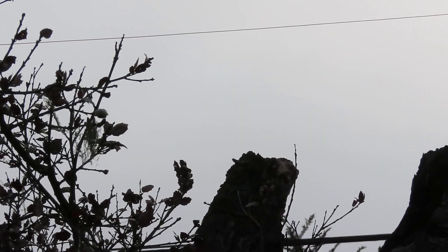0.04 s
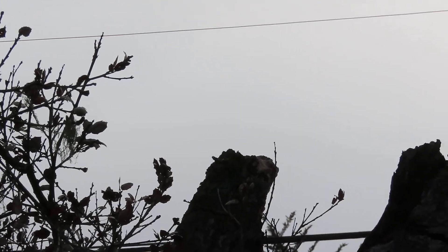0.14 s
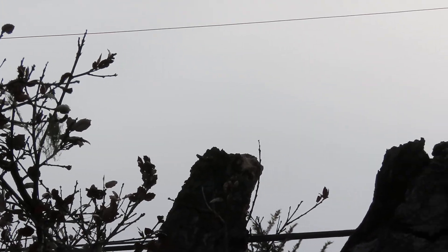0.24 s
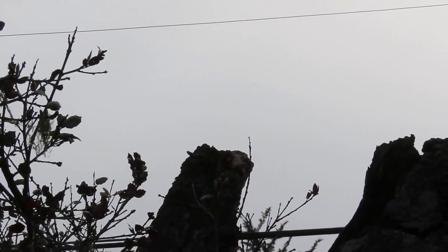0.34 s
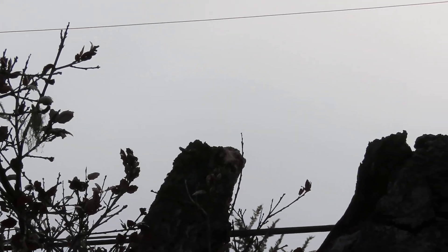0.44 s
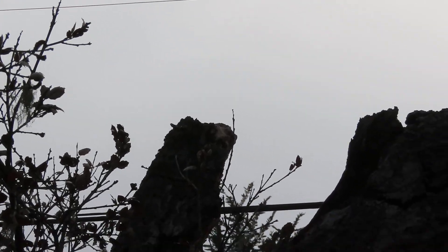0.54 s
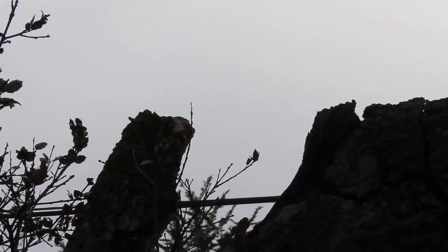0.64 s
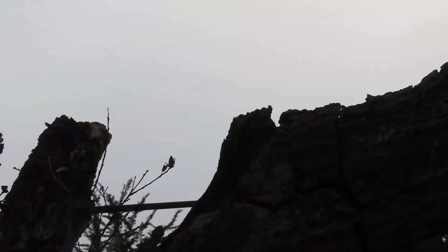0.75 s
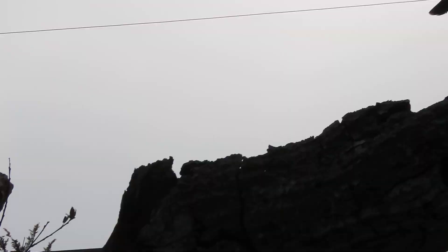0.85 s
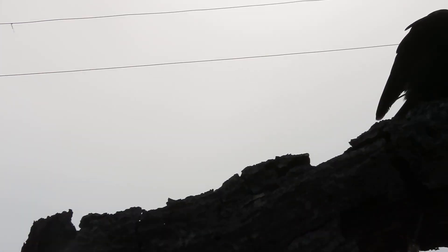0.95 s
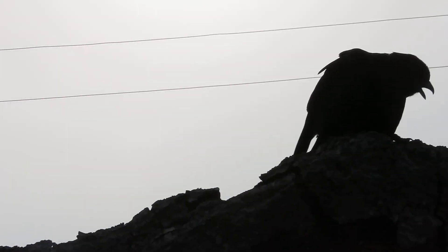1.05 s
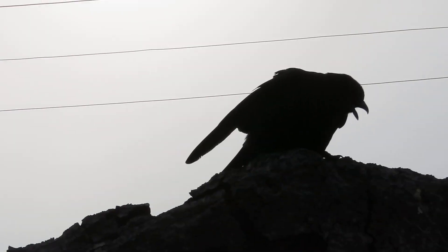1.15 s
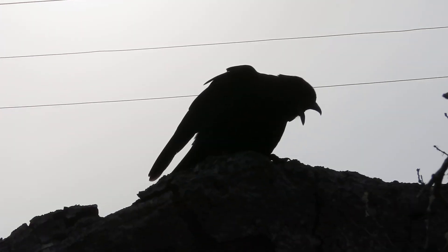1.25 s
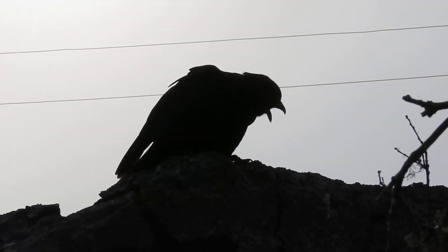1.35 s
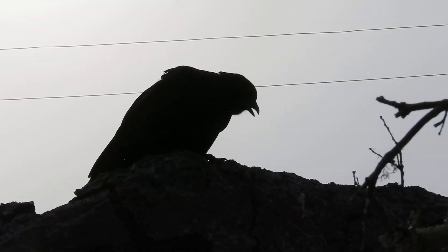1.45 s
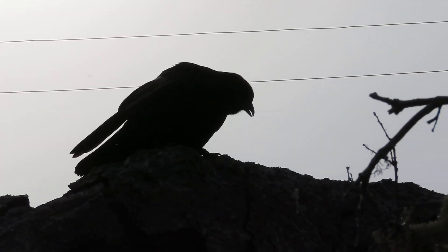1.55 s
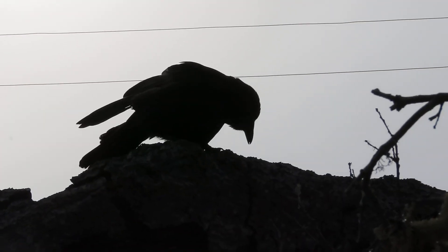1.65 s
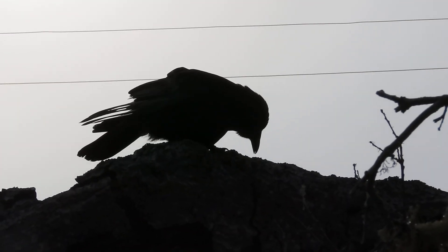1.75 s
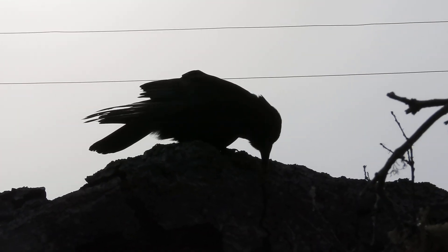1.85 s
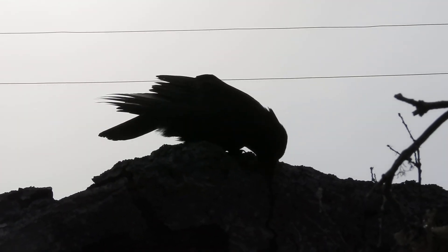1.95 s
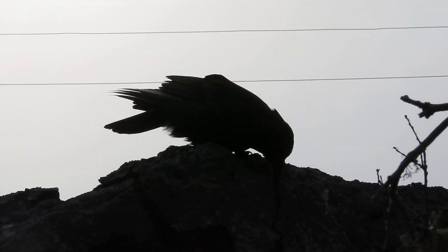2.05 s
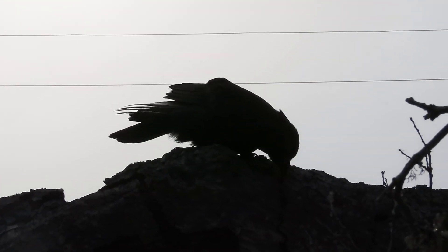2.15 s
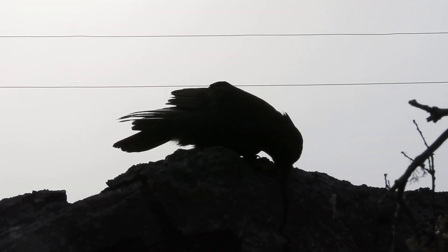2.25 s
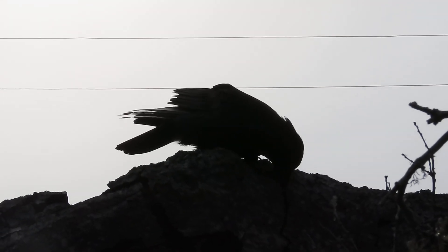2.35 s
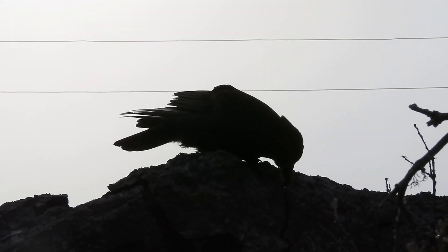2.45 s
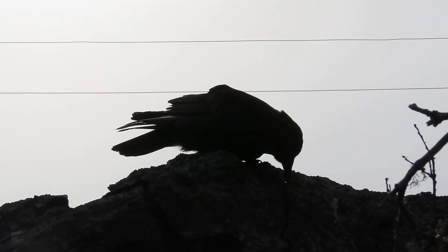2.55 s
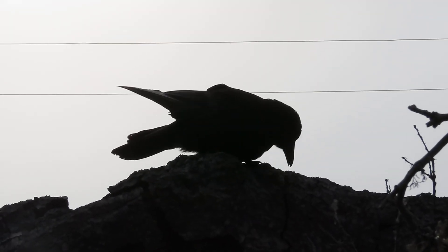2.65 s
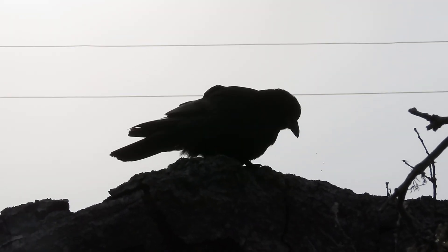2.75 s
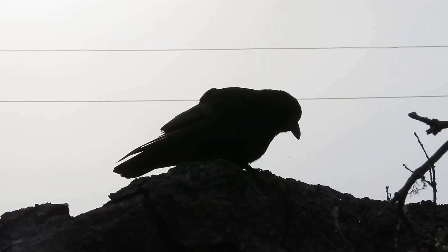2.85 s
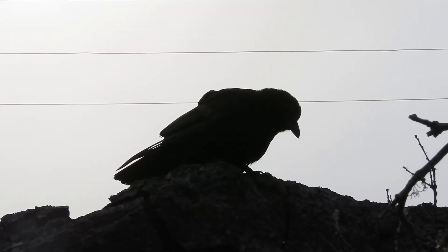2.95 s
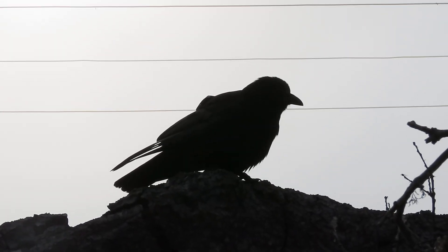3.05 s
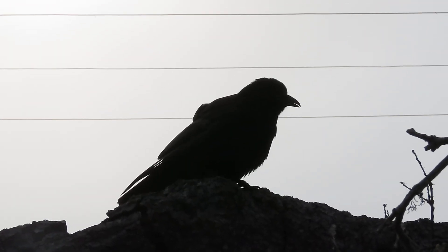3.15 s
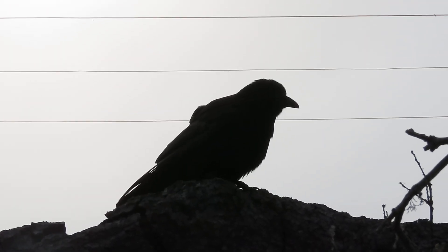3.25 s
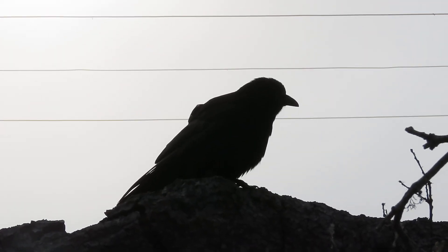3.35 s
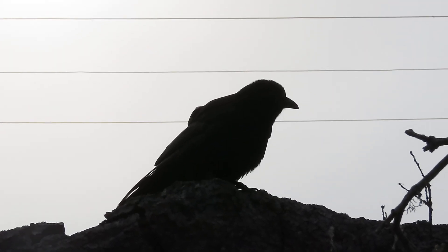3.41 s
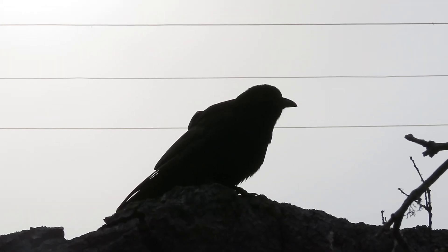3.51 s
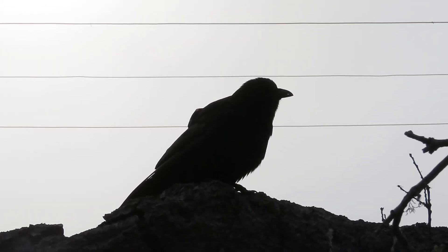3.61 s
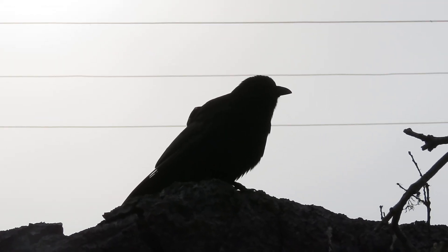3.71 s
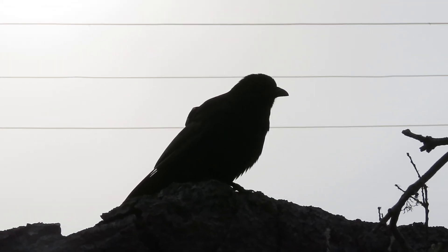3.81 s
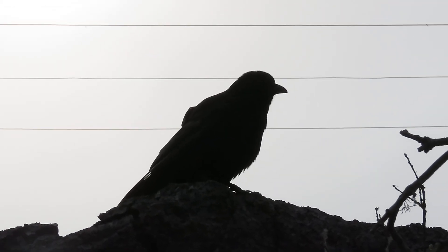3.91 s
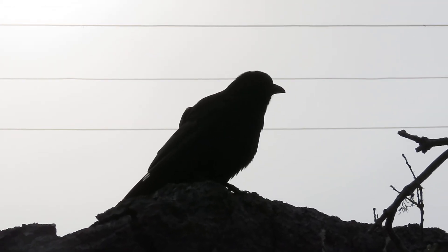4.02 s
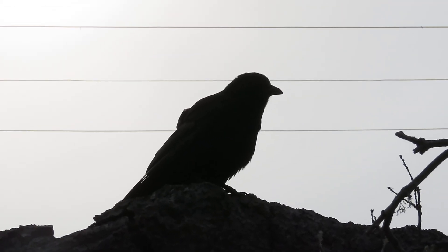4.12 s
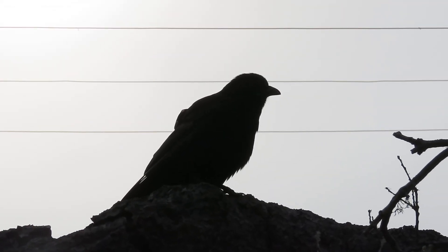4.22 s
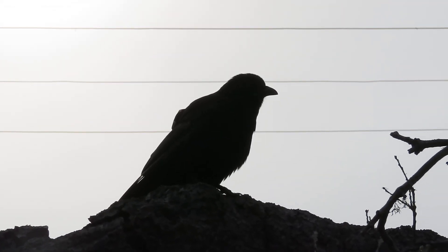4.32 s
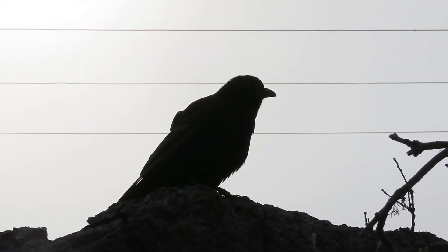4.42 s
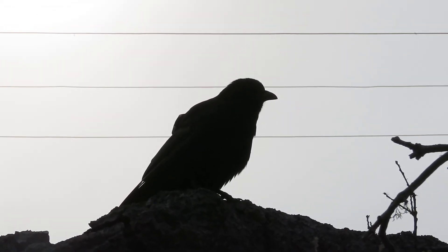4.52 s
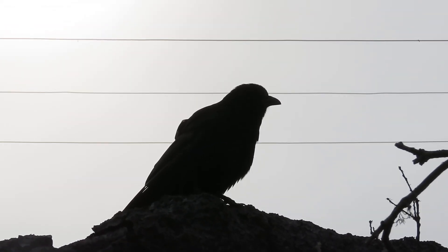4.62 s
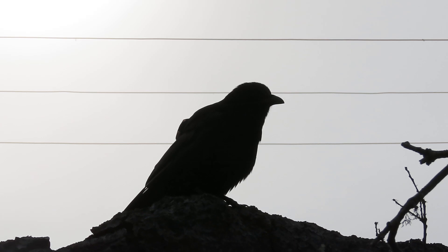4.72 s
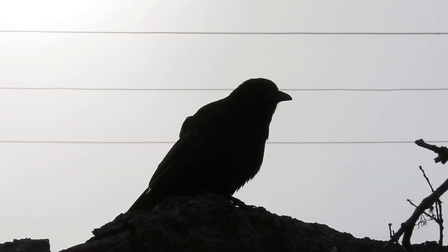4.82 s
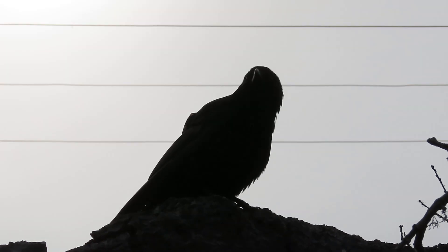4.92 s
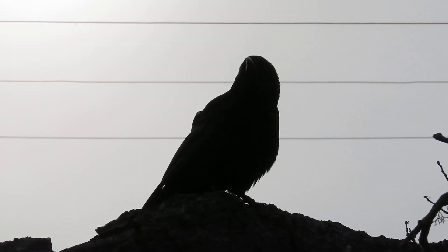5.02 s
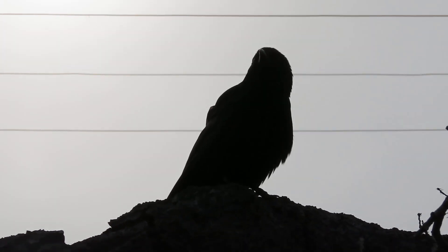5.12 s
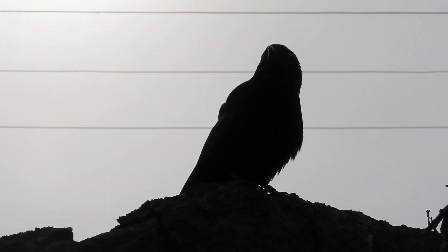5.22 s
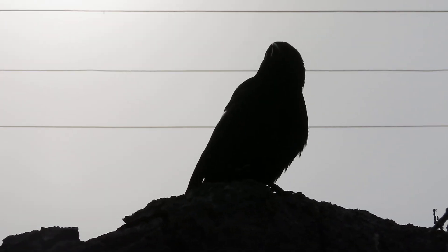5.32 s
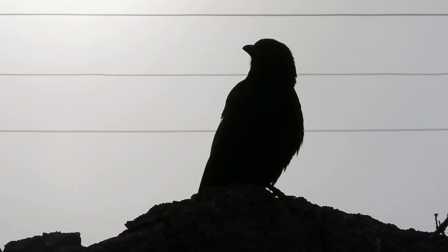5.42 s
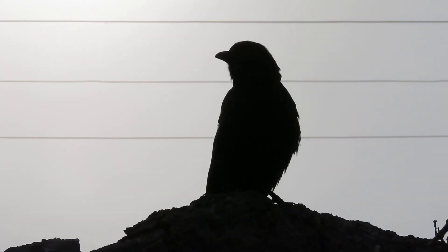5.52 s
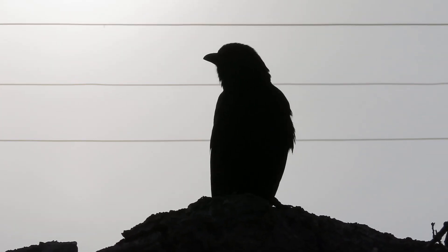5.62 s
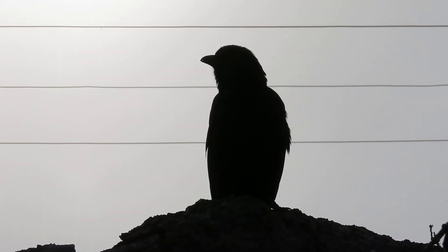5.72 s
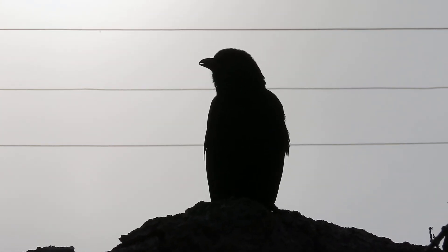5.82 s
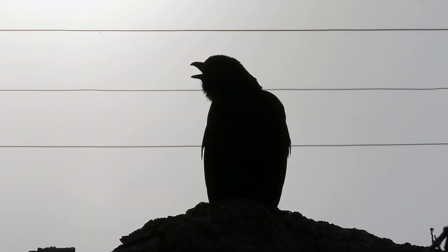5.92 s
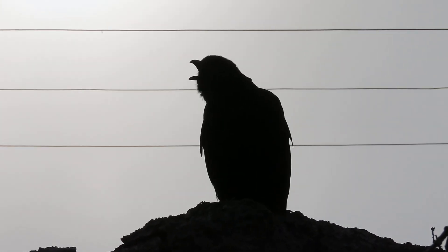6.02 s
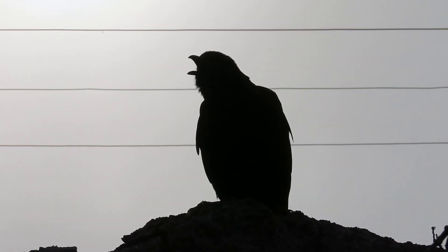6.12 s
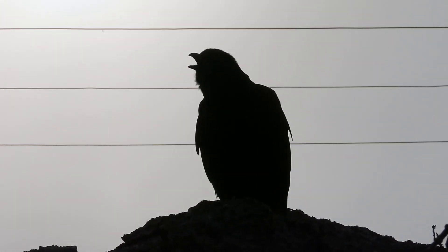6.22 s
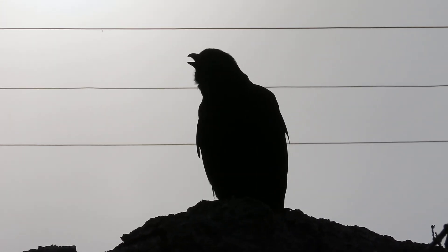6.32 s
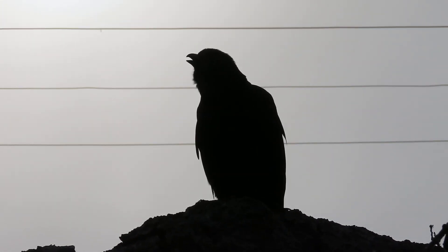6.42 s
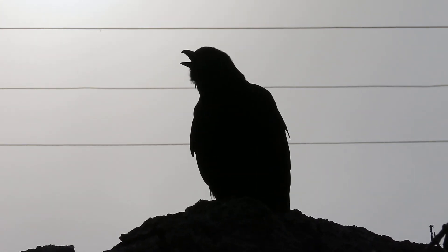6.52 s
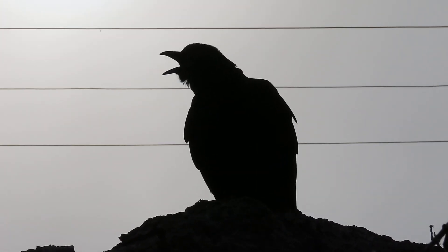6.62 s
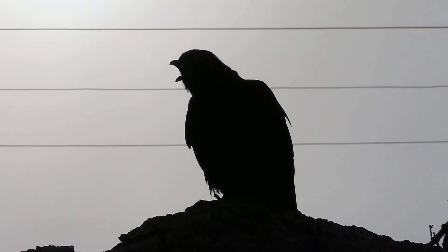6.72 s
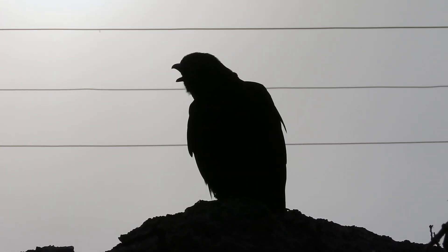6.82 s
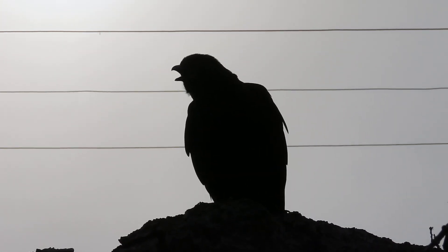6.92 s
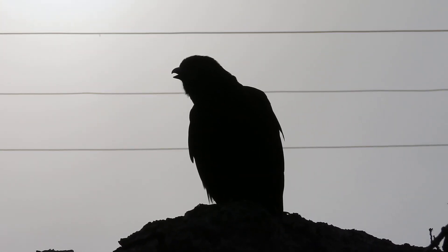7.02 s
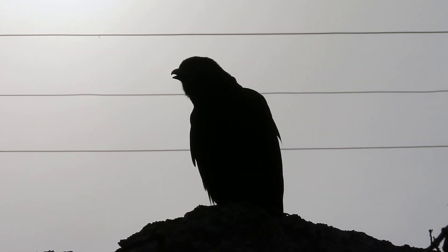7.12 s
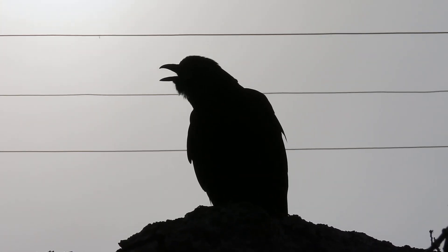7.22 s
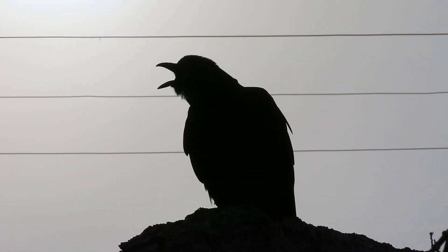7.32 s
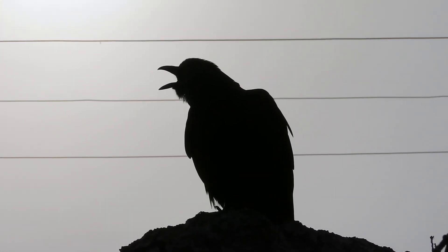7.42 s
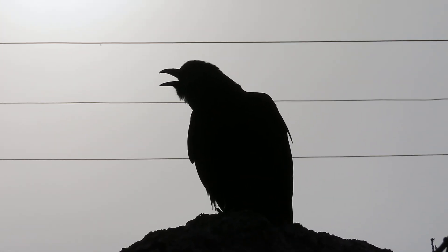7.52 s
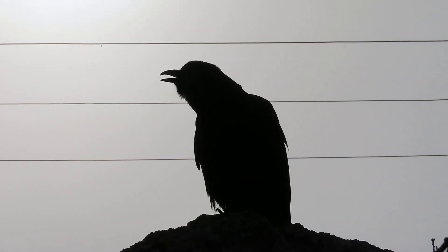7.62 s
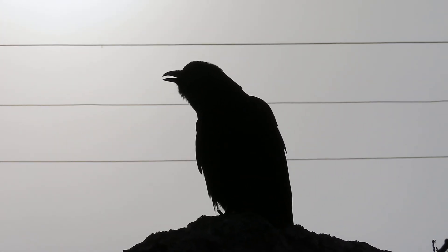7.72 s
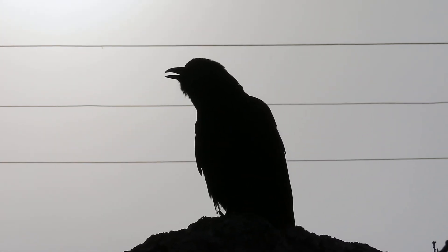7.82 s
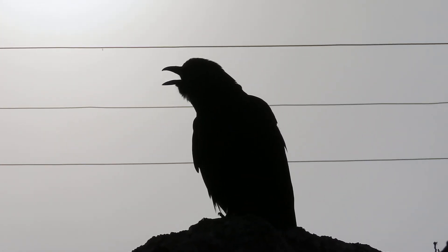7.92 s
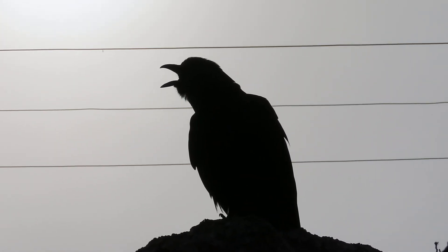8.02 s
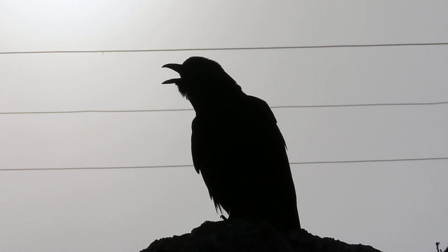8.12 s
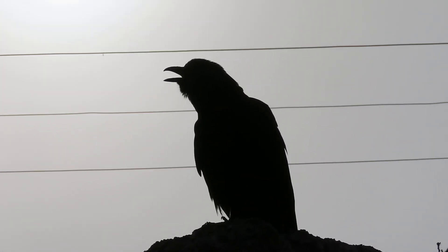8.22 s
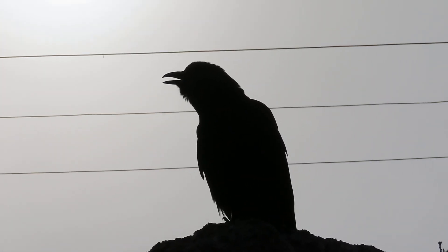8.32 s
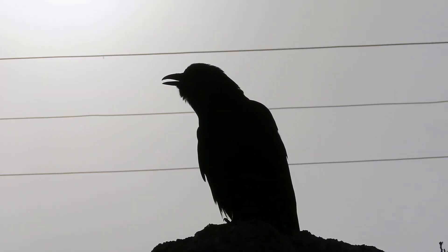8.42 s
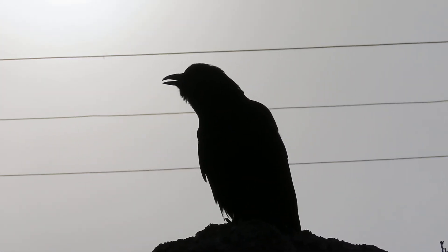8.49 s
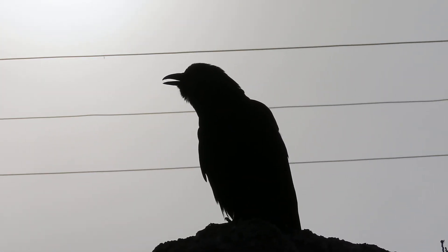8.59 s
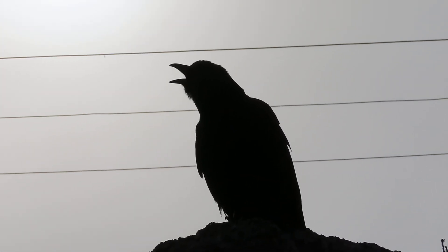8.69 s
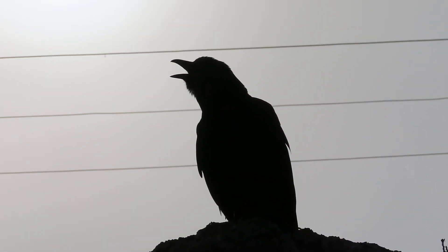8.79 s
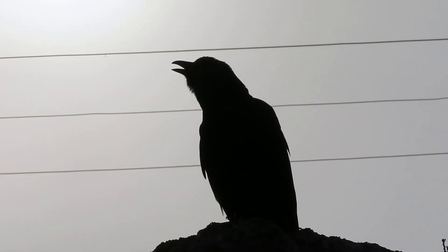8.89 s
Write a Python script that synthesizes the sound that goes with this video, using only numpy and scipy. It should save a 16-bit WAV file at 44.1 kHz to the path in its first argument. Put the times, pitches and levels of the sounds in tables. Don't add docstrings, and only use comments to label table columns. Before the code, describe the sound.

Outdoors in a quiet yard, a close crow is already in a long rasping caw, then two shorter ones follow with a faint claw tick on bark. Small birds chip, and farther crows answer more softly, one off to the left. From six seconds the near crow caws five times, overlapped by far caws, with low gusts buffeting the microphone over soft town hum.

```python
import sys
import numpy as np
from scipy import signal
from scipy.io import wavfile
from scipy.ndimage import uniform_filter1d

SR = 44100
rng = np.random.default_rng(int(sys.argv[2]) if len(sys.argv) > 2 else 0)


def attenuation_scalar(level_db):
    decades = np.asarray(level_db, float) / 20
    return 10 ** decades


def wav_record(signal):
    frames = np.transpose(np.atleast_2d(signal))
    bounded = np.clip(frames, -1, 1)
    quanta = np.round(bounded * 32767).astype(np.int16)
    wavfile.write(sys.argv[1], SR, quanta)


N = 394694

# pitch in Hz, level in dB per Hz.
HUM = [(12, -37), (20, -6.5), (59, 0), (129, -6), (289, -5.5), (549, -10.5), (811, -10), (1450, -17.5),
       (3080, -28.5), (3350, -29.5), (4190, -32.5), (5230, -34), (15500, -54.5)]
HUM_DB = -41.5
# pitch in Hz, likeness 0-1.
SAME = [(60, 1), (180, 0.72), (550, 0.88), (1650, 0.86), (4970, 0.48), (15000, 0.22)]
# time in seconds, peak in dB.
GUSTS = [(6.01, -42.5), (6.88, -56), (7.02, -46), (7.16, -50), (7.3, -36.5), (7.48, -39), (7.8, -36.5),
         (7.95, -36.5), (8.3, -39), (8.49, -35), (8.621, -41), (8.76, -39), (8.86, -41.5)]
GUST_RISE_DB_PER_S, GUST_FALL_DB_PER_S = 220, 112
# time in seconds, level in dB.
WHINE = [(0, -78), (1.1, -65), (1.6, -57), (3.2, -67.5), (3.902, -65), (5.1, -68), (5.3, -61.5), (6.6, -66),
         (8.95, -71)]
WHINE_HZ = 3280
# time in seconds, level in dB, pitch in Hz.
CHIPS = [
    [(1.148, -46, 6200), (1.156, -54, 5600), (1.17, -54, 5200), (1.2, -54, 5300)],
    [(3.275, -35, 2010), (3.288, -48, 4880), (3.298, -47, 5220), (3.315, -47, 5270), (3.325, -52, 4900),
     (3.338, -36, 2470)],
    [(4.075, -68, 5600), (4.09, -58, 5400), (4.13, -72, 5300)],
    [(1.53, -48, 5050), (1.57, -56, 4900), (1.62, -69, 4900), (1.72, -72, 4900)],
    [(4.36, -66, 3950), (4.38, -60, 3850), (4.41, -66, 3300)],
    [(4.05, -72, 6500), (4.07, -66, 6450), (4.09, -72, 6400)],
]
# pitch in Hz, time to fall by 60 dB in seconds.
YARD = [(300, 0.08), (1700, 0.96), (4000, 0.8), (10000, 1)]

# times in seconds, then levels in dB.
TICK_S = [0.46, .548, 1.553]
TICK_DB = [-34, -45, -44]
TICK_HZ = 3800

# start in seconds, length in seconds, peak in dB, top pitch in Hz, fade in dB.
FAR = [
    (2.187, .35, -27, 479.5, -2.5),
    (2.779, 0.3, -26, 507.7, -5),
    (3.496, 0.32, -26.5, 499.4, -4),
    (4.612, .115, -36, 504, 2),
    (4.689, 0.19, -41, 508, -1),
    (4.826, .38, -30.5, 500, -7),
    (5.116, 0.096, -37, 481.6, -1),
    (7.119, 0.33, -27.5, 476.4, -4),
    (7.599, .36, -28.5, 515, -2.5),
    (8.26, 0.39, -27, 511.6, -4),
]
FAR_LOW_HZ = [417, 402, 433, 500, 515, 430, 453, 448, 428, 415]
FAR_THROAT = [0, 1, 2, 3, 3, 4, 3, 5, 5, 5]
FAR_PAN_DB = [-.5, -.5, -.6, 4, 4, 4, 4, -.6, -.6, -.6]
SIDE_BIRD = [0, 0, 0, 1, 1, 1, 1, 0, 0, 0]
# seconds from its start, dB relative to the peak.
FAR_RISE = [(0, -14), (.018, -7.5), (0.044, 0.5)]
FAR_STOP_S, FAR_STOP_DB, FAR_FADE_BEND = 0.047, -14, 0.98
FAR_SINK, FAR_ROUGH, FAR_ROUGH_EDGE = 0.8, 0.4, 0.545
SIDE_QUICK, SIDE_DULL_DB, SIDE_CLOSE, SIDE_CLEAR = 0.21, -7, 0.035, 0.12
SIDE_THROB, SIDE_STEADY = 0.15, 0.035
# pitch in Hz, level in dB.
FAR_BASE = [(330, -11), (470, -26), (1050, -17), (2150, -8), (2800, -34), (4600, -34), (11500, -41),
            (15500, -49)]
# pitch in Hz, width in Hz, level in dB.
FAR_THROATS = [
    [(1670, 370, 1), (3760, 420, -14.5), (6000, 1300, -23.5), (8400, 5000, -32.5)],
    [(1690, 348, 1), (3470, 520, -17), (6030, 840, -25), (8800, 1600, -32)],
    [(1680, 510, 3), (3330, 420, -13.5), (6200, 590, -23), (9050, 1200, -32)],
    [(1460, 600, 6.5), (4060, 1500, -12), (6100, 4300, -22), (7940, 2000, -34)],
    [(1607, 340, 8), (3990, 300, -10.5), (5000, 300, -16), (6400, 910, -27)],
    [(1683, 490, 0.5), (3550, 870, -18), (6350, 860, -24), (9200, 1000, -32.5)],
]

# time in seconds, level in dB, pitch in Hz, beak resonance in Hz.
HELD = [
    (0.0, -13.5, 507.5, 1630),
    (0.1, -13, 515, 1660),
    (0.17, -15, 490.3, 1680),
    (0.25, -14.5, 488, 1785),
    (0.33, -14, 500, 1720),
    (0.44, -15.5, 470, 1680),
    (0.465, -21.5, 472, 1680),
    (0.485, -35, 470, 1700),
]
HELD_BEAT_HZ = 78.65
# start in seconds, length in seconds, top pitch in Hz, sag in Hz per second, fade in dB.
NEAR = [
    (0.687, 0.31, 566.6, 602, -7.5),
    (1.263, 0.29, 580, 952, -10.5),
    (6, 0.38, 545.8, 520.5, -13),
    (6.608, 0.44, 590, 559.6, -12),
    (7.318, .37, 615.4, 947, -10.5),
    (7.984, 0.35, 599.6, 1054, -11),
    (8.718, 0.31, 586, 1164, -15),
]
NEAR_BEAT_HZ = [87.5, 86, 91.4, 83.9, 78.3, 85.6, 82.32]
NEAR_THROAT = [0, 1, 2, 3, 3, 4, 4, 4]
NEAR_PAN_DB = [-1.6, -1.6, -1, -.6, -.6, -.6, -.6, -.6]
# seconds from its start, dB relative to the peak.
NEAR_RISE = [(0, -23), (0.021, -9), (0.044, -1), (.085, 0)]
NEAR_DB, NEAR_FADE_BEND = -10.5, 1.74
NEAR_STOP_S, NEAR_STOP_DB = 0.032, -9.5
TOP_S, SCOOP, TIRED_HZ = 0.098, 0.24, 426.6
BEAT_HOLD_S, BEAT_SAG_HZ_PER_S, BEAT_LOW_HZ = 0.0496, 85, 68.8
CLEAR, ROUGH_PER_DB, ROUGHEST = 0.2, 0.04, 0.6
BEAK_HZ, BEAK_PER_HZ = 1614, 0.5
NEAR_SWING = 0.47
# pitch in Hz, level in dB.
NEAR_BASE = [(300, -11.5), (550, -21.5), (1100, -17), (2250, -9), (3100, -27), (5000, -32.5),
             (11000, -41.5), (15500, -53.5)]
# pitch in Hz, width in Hz, level in dB.
NEAR_THROATS = [
    [(1680, 366, 7), (2046, 570, 2), (4090, 810, -15.5), (6150, 820, -23), (7500, 2700, -24)],
    [(1720, 440, 4), (2080, 510, -1.5), (3660, 810, -13), (5700, 700, -28), (7300, 2600, -25.5)],
    [(1720, 400, 4.5), (2100, 190, -6), (3990, 650, -13.5), (6080, 650, -42), (7670, 1350, -25)],
    [(1700, 360, 6), (2185, 440, -5), (4100, 660, -17), (5600, 700, -52), (7200, 2060, -26.5)],
    [(1680, 420, 5), (2280, 440, -8), (3970, 710, -16.5), (5600, 700, -50), (7500, 1370, -24.5)],
]

REST_HZ = 1700
PIPE_HZ, PIPE_DB = 1414, 4
NEAR_WET_DB, SCATTER_DB = -21, -10


def evened(x):
    return x / np.sqrt(np.mean(x ** 2) + 1e-20)


def read(points, hz):
    f, value = np.transpose(points)
    return np.interp(np.log(hz + 1), np.log(f + 1), value)


def played(rows):
    s, *columns = np.transpose(rows)
    t = np.arange(s[0], s[-1], 1 / SR)
    return [np.interp(t, s, c) for c in columns]


def add(mix, s, sound):
    part = mix[..., round(s * SR):][..., :sound.shape[-1]]
    part += sound[..., :part.shape[-1]]


def wander(count, hz):
    b, a = signal.butter(2, hz / (SR / 2))
    return evened(signal.lfilter(b, a, rng.standard_normal(count)))


def yard(x):
    taps = np.zeros((2, SR))
    at = np.arange(900, SR - 20, 20) + rng.integers(0, 20, (2, (SR - 901) // 20))
    np.put_along_axis(taps, at, rng.choice([-1., 1.], at.shape), 1)
    hz, t, z = signal.stft(taps, SR, nperseg=256)
    dying = attenuation_scalar(-60 * t / read(YARD, hz)[:, None])
    tail = signal.istft(z * dying, SR, nperseg=256)[1]
    return signal.fftconvolve(x[None], tail / np.linalg.norm(tail[0]), axes=1)[:, :N]


def ports(sound, pan_db, lag=0.017):
    slope = np.gradient(sound)
    body = np.diff(rng.standard_normal(60) * np.exp(-np.arange(60) / 15))
    scattered = np.convolve(slope, body / np.linalg.norm(body), "same")
    late = lag * slope + attenuation_scalar(SCATTER_DB) * scattered
    return np.array([(sound + late) * attenuation_scalar(pan_db / 2), (sound - late) * attenuation_scalar(-pan_db / 2)])


def hum():
    frames, hz = N // 256 + 5, np.fft.rfftfreq(1024, 1 / SR)
    a, b, c, d, patches = rng.standard_normal((frames, 513, 5)).T
    patches = evened(uniform_filter1d(uniform_filter1d(patches, 12, 0), 20, 1))
    same = np.clip(read(SAME, hz), -1, 1)[:, None]
    left = a + 1j * b
    right = same * left + np.sqrt(1 - same ** 2) * (c + 1j * d)
    z = np.array([left, right]) * attenuation_scalar(read(HUM, hz)[:, None] + 0.91 * patches)
    return attenuation_scalar(HUM_DB) * evened(signal.istft(z, nperseg=1024, noverlap=768)[1][:, :N])


def wind():
    band = signal.butter(2, [32, 105], "band", fs=SR, output="sos")
    low = signal.sosfilt(band, rng.standard_normal((2, N)))
    lumps = attenuation_scalar(0.55 * wander(N, 4.3))
    buffets = evened(lumps * (low[0] + 0.36 * low[1] * np.array([[1], [-1]])))
    t = np.arange(0, N / SR, 0.005)
    gusts = [db - np.maximum(GUST_RISE_DB_PER_S * (s - t), GUST_FALL_DB_PER_S * (t - s)) for s, db in GUSTS]
    level_db = np.maximum(np.max(gusts, axis=0), -90)
    return attenuation_scalar(np.interp(np.arange(N) / SR, t, level_db)) * buffets


def whine():
    s, level_db = np.transpose(WHINE)
    turns = np.cumsum(WHINE_HZ + 4 * wander(N, 31)) / SR
    loudness_db = np.interp(np.arange(N) / SR, s, level_db) + 1.0 * wander(N, 5.9)
    return attenuation_scalar(loudness_db) * np.sin(2 * np.pi * turns)


def songbirds():
    out = np.zeros(N)
    for rows in CHIPS:
        level_db, hz = played(rows)
        whistle = np.sin(2 * np.pi * np.cumsum(hz) / SR)
        add(out, rows[0][0], attenuation_scalar(level_db) * whistle * signal.windows.tukey(len(hz), 0.2))
    return out + attenuation_scalar(-9) * yard(out)


def tick():
    out, t = np.zeros(N), np.arange(300) / SR
    for s, db in zip(TICK_S, TICK_DB):
        click = np.diff(rng.standard_normal(301)) + 2 * np.sin(2 * np.pi * TICK_HZ * t)
        add(out, s, attenuation_scalar(db - 60 * t / 0.0083) * click)
    return out


def throat(base, peaks, dull_db=0):
    hz = np.geomspace(150, 17000, num=300)
    power = attenuation_scalar(2 * read(base, hz))
    for f, width, db in peaks:
        power = power + attenuation_scalar(2 * db) / (1 + (2 * (hz - f) / width) ** 2) ** 2
    edges_db = dull_db * np.clip((hz - 7000) / 4000, 0, 1) - 40 * np.clip(1 - hz / base[0][0], 0, 1)
    return np.transpose([hz, 10 * np.log10(power) + edges_db])


def coloured(x, points, mouth, pipe_db):
    size = 512
    grid = dict(nperseg=size, noverlap=size * 3 // 4, nfft=2 * size)
    hz, t, z = signal.stft(x, SR, return_onesided=False, **grid)
    stretch = np.interp(t * SR, np.arange(len(x)), mouth)
    at = abs(hz)[:, None] / stretch
    pipe = pipe_db * np.cos(2 * np.pi * at / PIPE_HZ) * (at > 3.5 * PIPE_HZ)
    log_gain = np.log(attenuation_scalar(np.maximum(read(points, at) + pipe, -90)))
    z = z * np.exp(np.conj(signal.hilbert(log_gain, axis=0)))
    return signal.istft(z, SR, input_onesided=False, **grid)[1].real[:len(x)]


def caw(columns, throat, swing=0.73, throb=0.36, second_db=-4, jitter=0.0547, lead=0.26, pipe_db=PIPE_DB):
    level_db, hz, beat_hz, rough, beak_hz = columns
    count, rough = len(hz), np.clip(rough, 0, 1)
    beat = 2 * np.pi * (np.cumsum(beat_hz * (1 + 0.2986 * rough * wander(count, 33.8))) / SR - 0.3)
    steady = 2 * np.pi * np.cumsum(hz * (1 + jitter * rough * wander(count, 246))) / SR
    rocked = steady + swing * np.sin(beat + lead)
    folds = sum(np.cos(k * rocked) for k in range(1, 27))
    puffs = (3.3 + np.maximum(np.cos(rocked), 0) ** 2) * rng.standard_normal(count)
    puffs = signal.lfilter([1, -0.8], [1, -0.3], puffs)
    creak = 1 + np.clip((level_db.max() - level_db - 9.0) / 7, 0, 3)
    depth = np.clip(throb * creak, 0, 1)
    lopsided = np.cos(beat + 1.11 * np.cos(beat))
    push = ((1 + depth * lopsided) / (1 + depth)) ** creak
    push = push * attenuation_scalar(5.15 * rough * wander(count, 73))
    push = push / np.sqrt(uniform_filter1d(push ** 2, 900) + 1e-6)
    drive = push * ((1 - rough) * folds + rough * 6 * evened(puffs))
    drive += (1 - rough) * attenuation_scalar(second_db) * np.cos(steady + beat)
    voice = coloured(drive, throat, beak_hz / REST_HZ, pipe_db)
    voice = voice / np.sqrt(uniform_filter1d(voice ** 2, 2500) + 1e-12)
    return attenuation_scalar(level_db) * voice * signal.windows.tukey(count, 300 / count)


def effort(t, rise, fade_db, bend, stop_s, stop_db):
    s, db = np.transpose(rise)
    end = t[-1] - stop_s
    spent = np.clip((t - s[-1]) / max(end - s[-1], 0.01), 0, 1)
    return np.interp(t, s, db) + fade_db * spent ** bend + stop_db * np.clip((t - end) / stop_s, 0, 1)


def far_controls(length, peak_db, top_hz, fade_db, low_hz, side):
    t = np.arange(0, length, 1 / SR)
    hz = np.interp(t, [0.045, FAR_SINK * length], [top_hz, low_hz])
    rough = np.interp(t, [0, 0.045, max(length - 0.08, 0.05), length],
                      [FAR_ROUGH_EDGE, FAR_ROUGH, FAR_ROUGH, FAR_ROUGH_EDGE])
    rise = np.multiply(FAR_RISE, [SIDE_QUICK if side else 1, 1])
    level_db = peak_db + effort(t, rise, fade_db, FAR_FADE_BEND, FAR_STOP_S, FAR_STOP_DB)
    beak_hz = REST_HZ * (1 + side * SIDE_CLOSE * (0.5 - t / length))
    return level_db, hz, hz / 7.3, rough - side * SIDE_CLEAR, beak_hz


def beat_and_rough(t, under_db, beat_hz):
    slowed = np.maximum(beat_hz - BEAT_SAG_HZ_PER_S * np.maximum(t - BEAT_HOLD_S, 0), BEAT_LOW_HZ)
    return slowed, np.minimum(CLEAR - ROUGH_PER_DB * under_db, ROUGHEST)


def held_controls():
    level_db, hz, beak_hz = played(HELD)
    t = 0.3 * np.arange(len(hz)) / SR
    slowed, rough = beat_and_rough(t, level_db - NEAR_DB, HELD_BEAT_HZ)
    return level_db, hz, slowed, rough, beak_hz


def near_controls(length, top_hz, sag, fade_db, beat_hz):
    t = np.arange(0, length, 1 / SR)
    under_db = effort(t, NEAR_RISE, fade_db, NEAR_FADE_BEND, NEAR_STOP_S, NEAR_STOP_DB)
    climb = top_hz * (1 - SCOOP * abs(1 - t / TOP_S) ** 2.2)
    drop_hz = top_hz - TIRED_HZ
    sink = TIRED_HZ + drop_hz * np.exp(-sag * (t - TOP_S) / drop_hz)
    hz = uniform_filter1d(np.where(t < TOP_S, climb, sink), size=1300)
    beak_hz = BEAK_HZ + BEAK_PER_HZ * (hz - TIRED_HZ)
    return NEAR_DB + under_db, hz, *beat_and_rough(t, under_db, beat_hz), beak_hz


def crows():
    out, wet = np.zeros((2, N)), np.zeros(N)
    for (s, *row), low_hz, side, k, pan_db in zip(FAR, FAR_LOW_HZ, SIDE_BIRD, FAR_THROAT, FAR_PAN_DB):
        shape = throat(FAR_BASE, FAR_THROATS[k], side * SIDE_DULL_DB)
        sound = caw(far_controls(*row, low_hz, side), shape, swing=0.85, throb=0.12 + side * SIDE_THROB,
                    jitter=0.0687 - side * SIDE_STEADY, pipe_db=0.5)
        add(out, s, ports(sound, pan_db, lag=0.36 + 0.19 * pan_db))
        add(wet, s, attenuation_scalar(-15) * sound)
    near = [(0, held_controls())]
    for (s, *row), beat_hz in zip(NEAR, NEAR_BEAT_HZ):
        near.append((s, near_controls(*row, beat_hz)))
    for (s, controls), k, pan_db in zip(near, NEAR_THROAT, NEAR_PAN_DB):
        sound = caw(controls, throat(NEAR_BASE, NEAR_THROATS[k]), swing=NEAR_SWING)
        add(out, s, ports(sound, pan_db))
        add(wet, s, attenuation_scalar(NEAR_WET_DB) * sound)
    return out + yard(wet)


def scene():
    return hum() + wind() + whine() + songbirds() + tick() + crows()


def top_cut(x):
    return signal.sosfilt(signal.butter(12, 15710, fs=SR, output="sos"), x)


def record(dry):
    return top_cut(1.167 * np.tanh(dry / 1.091))


dry = scene()
out = record(dry)
wav_record(out)
```